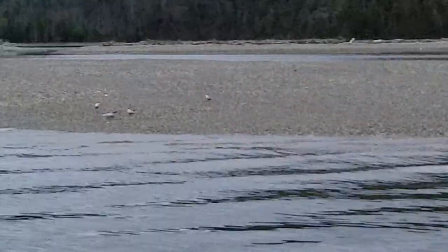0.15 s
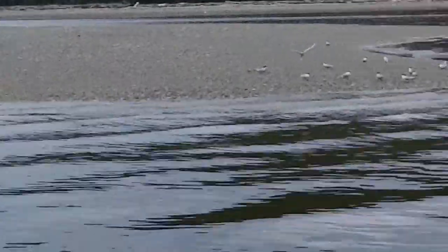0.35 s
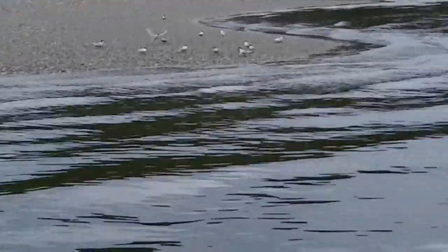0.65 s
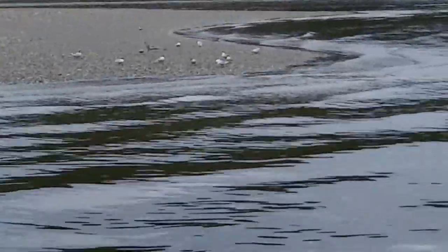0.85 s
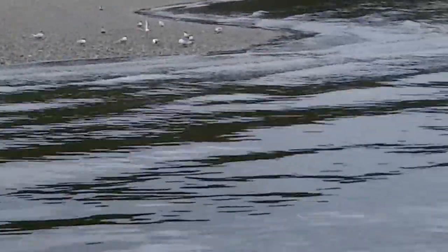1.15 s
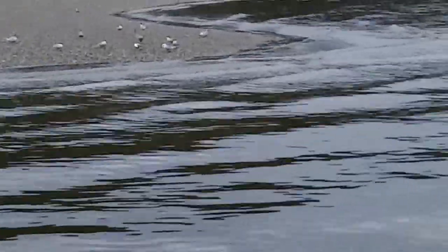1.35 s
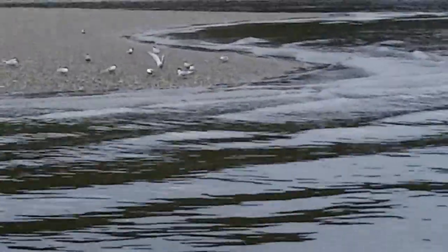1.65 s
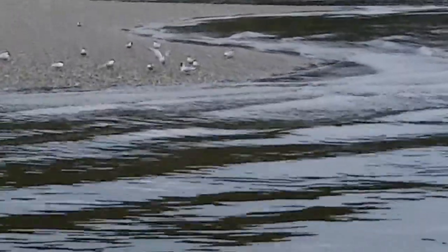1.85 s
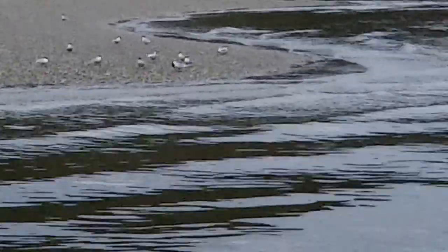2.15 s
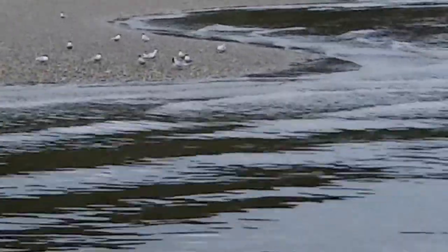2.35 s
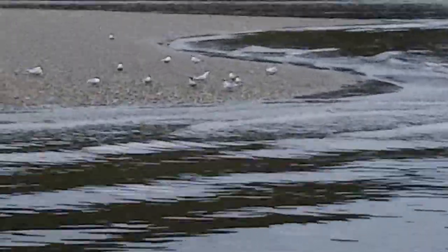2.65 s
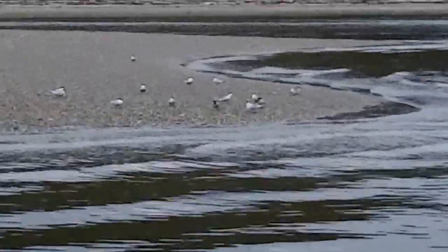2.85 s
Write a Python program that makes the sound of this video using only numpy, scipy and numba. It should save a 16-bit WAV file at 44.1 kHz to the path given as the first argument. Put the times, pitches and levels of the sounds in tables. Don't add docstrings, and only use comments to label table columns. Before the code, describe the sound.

Seabirds squawk and rasp almost nonstop by the shore above a chugging idling boat and soft water.

```python
import sys
import numpy as np
from scipy import signal
from scipy.fft import rfft, irfft
from scipy.io import wavfile
from scipy.ndimage import uniform_filter1d
from numba import njit

SR = 44100
rng = np.random.default_rng(int(sys.argv[2]) if len(sys.argv) > 2 else 0)


def to_linear_factor(level_db):
    exponent = np.asarray(level_db, float) / 20
    return 10 ** exponent


def digitize_waveform(pressure):
    field = np.atleast_2d(pressure).T
    bounded = np.clip(field, -1, 1)
    quanta = np.round(bounded * 32767).astype(np.int16)
    wavfile.write(sys.argv[1], SR, quanta)


N = 132741


@njit
def svf(x, hz, width):
    y, b, l = np.empty(len(x)), 0., 0.
    g, k = np.tan(np.pi * hz / SR), width / hz
    for i in range(len(x)):
        v = (b + g * (x[i] - l)) / (1 + g * (g + k))
        b, l, y[i] = 2 * v - b, l + 2 * g * v, k * v
    return y


def level(x, db):
    return x * to_linear_factor(db) / np.sqrt(np.mean(x ** 2))


def walk(rate, n=N):
    hold = int(SR / rate)
    steps = np.repeat(rng.standard_normal(n // hold + 1), hold)
    return 1.324 * uniform_filter1d(uniform_filter1d(steps, hold), hold)[:n]


def ring(x, body):
    return sum((-1) ** k * to_linear_factor(db) * svf(x, 1. * hz, 1. * width) for k, (hz, width, db) in enumerate(body))


def dull(x, hz):
    return svf(x, hz, 3.9 * hz)


def engine():
    # start_s, lead_turns
    crank_lead = [(0, 0.13), (.4, 0.37), (.6, 0.277), (1.1, 0.16), (2.3, .55), (3.01, 0.34)]
    # place (0-1), thump_db, ring_db
    firings = [(.01, -18, -15.5), (0.21, 1, -19), (.38, -3.5, -13.5), (.53, 1, -21.5), (0.672, 6, -21),
               (0.841, 1.5, -13)]
    # pitch_hz, width_hz, level_db
    exhaust = [(97.2, 7.3, -2), (152.7, 15.4, 0), (241.5, 28.4, -3)]
    hull = [(381, 44, 0.5), (428.8, 25, 1.5), (625.3, 25, -4.5)]
    turns_hz, scatter_db = 18.4, 1
    t = np.arange(N) / SR
    cycle = (turns_hz * t + np.interp(t, *np.array(crank_lead).T)) / 2
    thump, knock = np.zeros((2, N))
    for place, thump_db, ring_db in firings:
        at = np.flatnonzero(np.diff(np.floor(cycle - place + .006 * walk(30))) > 0)
        scatter = scatter_db * rng.standard_normal((len(at), 2)).T
        thump[at] = to_linear_factor(thump_db + scatter[0])
        knock[at] = to_linear_factor(ring_db + scatter[1])
    from_exhaust = level(dull(ring(thump, exhaust), 190.0), -44.5)
    from_hull = level(dull(ring(knock, hull), 390.0), -46)
    return from_exhaust + from_hull


def water():
    # pitch_hz, level_db (per Hz)
    balance = [(20, -1.5), (70, -7), (400, -11), (1200, -11.5), (2400, -18.5), (5000, -34), (7500, -23)]
    out, swell = 0, walk(2.07)
    f, db = np.array(balance).T
    for hz in 28 * 2 ** np.arange(0, 8.1, .5):
        band = svf(svf(rng.standard_normal(N), hz, hz / 2), hz, hz / 2)
        band_db = np.interp(np.log(hz), np.log(f), db)
        out = out + to_linear_factor(band_db + swell + 2 * walk(14)) * band
    return level(out, -44)


def add(out, trill, tone, curve, hurry=0):
    dip_s, sag_share, edge_s, wobble = .0036, .03, .006, .004
    patchy_db, breath_db, calm_hz = 1.1, -17, 54
    hurry_s, lean = .035, .35
    rate, at, dip, gate_db = trill
    s, hz, db = np.array(curve, float).T
    n = np.arange(max(int((s[0] - edge_s) * SR), 0), min(int((s[-1] + edge_s) * SR), N))
    t, m = n / SR, len(n)
    rough = rate / calm_hz

    def smooth(values):
        return uniform_filter1d(np.interp(t, s, values), size=500)

    count = (t - at) * rate - hurry * np.exp((s[0] - t) / hurry_s)
    turn = (count + .03 * rough ** 2 * walk(30, m) + .5) % 1 - .5
    notch = np.exp(-abs(turn / min(dip_s * rate, .24) / (1 - lean * np.sign(turn))) ** 3)
    sag = uniform_filter1d(turn % 1 - .5, size=100)
    pitch = smooth(hz) * (1 - dip * notch - sag_share * sag + wobble * rough ** 2 * walk(151.0, m))
    phase = 2 * np.pi * np.cumsum(pitch) / SR
    breath = to_linear_factor(breath_db) * rough * walk(900, m)
    voice = 0
    for k, tone_db in enumerate([tone[0], 0, tone[1], tone[2]]):
        strength = to_linear_factor(tone_db + patchy_db * rough * walk(60.5, m))
        voice = voice + strength * (1 + breath) * np.sin((k + 1) * phase)
    to_edge = np.minimum(n - n[0], (s[-1] + edge_s - t) * SR)
    edge = np.clip(to_edge / (2 * edge_s * SR), 0, 1)
    out[n] += np.sqrt(2) * voice * edge * to_linear_factor(smooth(db) - gate_db * notch)


def single_cries():
    # (start_s, pitch_hz, level_db)
    cries = [
        ((79, 0.01, .12, 2.9), (-11, -3.5, -12.5), [(0, 1190, -36), (.1, 1194, -38), (.2, 1125, -41), (.33, 1030, -46.5)]),
        ((78, .061, .09, 6), (-21, -9, -16), [(.042, 1250, -30), (.07, 1420, -30), (.125, 1530, -31), (.17, 1490, -26), (.215, 1410, -24), (.252, 1170, -31)]),
        ((78, .1, 0.089, 10), (2.5, -5, -14), [(.08, 1805, -41), (.2, 1798, -42.5), (.3, 1620, -43)]),
        ((88, .274, .14, 14), (-24, -15, -19), [(.258, 1340, -24), (.29, 1610, -26), (.315, 1560, -28), (.345, 1580, -26)]),
        ((32.8, .467, .1, 8.6), (-12.5, -9.5, -19), [(.325, 1500, -30), (.356, 1738, -26), (.42, 1606, -30), (.45, 1595, -26), (.5, 1546, -28), (.6, 1610, -24.5), (.64, 1533, -24), (.665, 1200, -28.5), (.695, 1190, -28.5)]),
        ((75, .5, 0.16, 6.4), (-23.5, -4.5, -11), [(.44, 1330, -31.5), (.5, 1353, -32.5), (.69, 1407, -32), (.76, 1495, -35)]),
        ((77, 0.92, 0.089, 7.4), (1.8, -7.5, -11.5), [(.74, 1570, -36.5), (.78, 1837, -43.5), (.87, 1803, -40)]),
             ((60, .9, 0.14, 5.5), (-3, -7.5, -9), [(.875, 1406, -34), (.9, 1600, -35), (1.0, 1500, -43.5)]),
        ((104, 1.0, 0.14, 4.7), (-11.5, -5.5, -14.5), [(.885, 1400, -32.5), (1.0, 1230, -36), (1.05, 1120, -33), (1.07, 1290, -32.5), (1.11, 1570, -36)]),
        ((77, 1.05, 0.076, 12), (-23, -22, -15), [(.975, 1430, -29), (1.01, 1310, -34), (1.062, 1220, -35)]),
        ((56, 0.92, 0.076, 7.3), (-1, -14.5, -15), [(1.085, 1500, -41.5), (1.12, 1490, -39.5), (1.152, 1520, -41), (1.176, 1270, -43.5)]),
        ((70, 1.241, 0.11, 7.8), (-7, -4, -6.5), [(1.224, 1080, -37.5), (1.26, 1150, -41), (1.29, 1200, -36)]),
        ((101, 1.31, 0.05, 3.1), (-12, -13, -16), [(1.245, 1351, -40.5), (1.28, 1357, -33.5), (1.34, 1389, -32), (1.41, 1340, -33), (1.45, 1200, -33.5)]),
        ((50, 1.46, .05, 3), (-5, -8, -24), [(1.465, 1600, -43), (1.49, 1780, -38), (1.515, 1700, -44)]),
        ((51, 1.6, 0.046, 3.7), (-5.5, -9.5, -12.5), [(1.585, 1169, -40.5), (1.62, 1230, -41.5), (1.645, 1420, -41), (1.665, 1370, -39)]),
        ((51, 1.66, 0.049, 3.7), (-9, -11, -24), [(1.655, 1250, -38), (1.71, 1200, -38)]),
             ((43.5, 1.881, 0.14, 18), (-15, -10.5, -28.5), [(1.755, 1980, -29.5), (1.764, 1900, -14.5), (1.775, 1750, -40), (1.79, 1790, -41.5), (1.89, 1716, -37.5), (2.0, 1495, -42.5), (2.2, 1573, -43)]),
        ((80, 1.766, 0.079, 6.1), (-14, -12.5, -13), [(1.705, 1047, -24.5), (1.73, 1202, -32.5), (1.75, 1383, -30.5), (1.815, 1343, -35)]),
        ((39, 1.72, 0.071, 7.7), (-2, -5.5, -15), [(2.06, 1845, -48.5), (2.26, 1772, -46), (2.36, 1687, -42.5)]),
        ((50.3, 2.45, .21, 3), (-2, 5, -14), [(2.365, 1530, -51), (2.42, 1650, -47), (2.6, 1640, -48), (2.65, 1600, -54)]),
             ((58, 2.6, 0.12, 8.3), (-2, -4.5, -15), [(2.66, 1480, -58), (2.69, 1610, -42), (2.75, 1587, -44), (2.785, 1490, -49)]),
        ((34.5, 2.911, 0.13, 12), (3, -1.7, -13), [(2.77, 1450, -49), (2.9, 1501, -44.5), (3.01, 1427, -48)]),
        ((89, 2.85, 0.062, 3.1), (-1.7, -5.5, -9), [(2.83, 1176, -40), (2.88, 1117, -44), (2.93, 1050, -45)]),
    ]
    out = np.zeros(N)
    for cry in cries:
        add(out, *cry)
    return out


def flock(count=44):
    out = np.zeros(N)
    for k, (a, b, c, d) in enumerate(rng.random((count, 4))):
        s = (k + a) / count * N / SR - .1
        hz = np.interp(b, [0, 1], (1104, 1768.4))
        length = np.interp(c, [0, 1], (.15, 0.3))
        db = -42 + 6 * d
        arch = [(s, .88 * hz, db - 15.0), (s + 0.34 * length, hz, db), (s + length, 0.75 * hz, db - 14.0)]
        add(out, (40 + 50 * d, s, .14, 6), (-2, -3, -9), arch)
    return out


def knocks():
    # start_s, level_db (peak)
    taps = [
        (.3522, -12),
        (.4873, -20),
    ]
    # pitch_hz, level_db, fade_s (time to fall 60 dB)
    tap_rings = [(650, -13, .012), (2050, -7, .007), (3300, -7, .008), (4100, -4, .005)]
    push_db, push_s, rise_s = -9, .0005, .0005
    out, t = np.zeros(N), np.arange(-200, 900) / SR
    tap = to_linear_factor(push_db) * np.exp(-((t + push_s / 2) / push_s) ** 2)
    for hz, db, t60 in tap_rings:
        fade = np.where(t < 0, np.exp(t / rise_s), to_linear_factor(-60 * t / t60))
        tap = tap + to_linear_factor(db) * np.cos(2 * np.pi * hz * t) * fade
    for s, db in taps:
        out[((s + t) * SR).round().astype(int)] += to_linear_factor(db) * tap
    return out


def repeating_bird():
    # start_s, rasp_length_s, one_dip_s, dips_per_s, level_db
    calls = [
        (1.265, .25, 1.48, 85, -36),
        (1.68, .245, 1.876, 83, -34.5),
        (2.082, .266, 2.288, 80, -31),
        (2.513, .249, 2.711, 75.3, -31.5),
    ]
    # share_of_length, pitch_hz, level_db
    rasp = [(0, 1089, -4), (.12, 1192, -1), (.3, 1225, -0.5), (.6, 1235, 0.5), (1, 1184, 1)]
    # start_s (after the rasp), pitch_hz, level_db
    ending = [(0, 1300, -1), (.032, 1420, 0.), (.05, 1360, -.5), (.066, 1190, -3)]
    effort_per_db, hurry_turns, ending_db = .015, .8, -36
    out = np.zeros(N)
    for s, length, at, rate, db in calls:
        up = 1 + effort_per_db * (db + 31)
        rasp_curve = [(s + length * u, hz * up, db + d) for u, hz, d in rasp]
        add(out, (rate, at, .14, 11.5), (-16, -32, -37), rasp_curve, hurry_turns)
        ending_curve = [(s + length + u, hz, ending_db + d) for u, hz, d in ending]
        add(out, (rate, at, .04, 5), (-12.5, -17, -21.5), ending_curve)
    return out


def scatter_off_shore(birds):
    t = np.arange(SR // 3) / SR
    t60_s = .1
    tail = level(rng.standard_normal(len(t)) * to_linear_factor(-60 * t / t60_s), -19) / np.sqrt(len(t))
    return signal.fftconvolve(birds, tail)[:N]


def scene():
    boat = engine() + water()
    near = single_cries() + repeating_bird()
    stir = np.sqrt(uniform_filter1d(near ** 2, size=350).clip(0))
    birds = near + flock() * np.clip(stir / to_linear_factor(-29.5), .04, .75)
    mono = boat + birds + scatter_off_shore(birds) + knocks()
    return np.array([mono, mono])


def roll_off(x):
    return signal.sosfilt(signal.butter(12, 15260, fs=SR, output="sos"), x)


def record(dry):
    # start_s, end_s
    dropouts = [(.38, .635), (1.76, 1.81), (2.41, 2.51), (2.83, 3.05)]
    low, start, gap, top = 7600, 8050, 11850, 15050
    hiss_db, copy_db, click_lift_db = -62, -36, 14
    f, x, t = np.fft.rfftfreq(N, 1 / SR), dry[0], np.arange(N) / SR

    def shift(hz):
        return x * np.cos(2 * np.pi * hz * t)

    sharp = np.clip((uniform_filter1d(abs(x), size=40) - .115) / .03, 0, 1)
    copies = shift(6700) + .5 * sharp * shift(10100)
    lift = to_linear_factor(copy_db + click_lift_db * sharp) * copies
    high = rfft(lift + to_linear_factor(hiss_db) * rng.standard_normal(N))
    high = high * (f > start) * np.clip(abs(f - gap) / 120, 0, 1)
    whole = rfft(x) * np.clip((low - f) / 1800, 0, 1) ** 0.54 + high
    edges = np.arange(low - 2000, top, 400)
    y = irfft(whole * (f < edges[0]), N)
    gone = uniform_filter1d(sum((s < t) & (t < e) for s, e in dropouts) * 1., size=400)
    for hz in edges:
        loss = (0.3 + 4 * gone) * (hz < low) * ((hz - edges[0]) / 1600) ** 2
        kept = np.clip(3 * (walk(18) + 1.48 - loss), 0, 1)
        band = irfft(whole * (f >= hz) * (f < min(hz + 400, top)), N)
        y = y + kept * to_linear_factor(2.5 * walk(40)) * band
    return roll_off(np.array([y, y]))


dry = scene()
out = record(dry)
digitize_waveform(out)
```